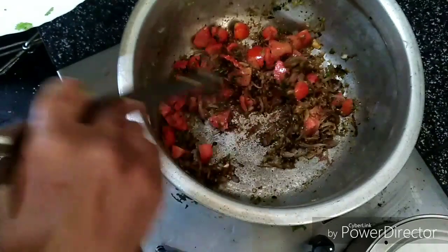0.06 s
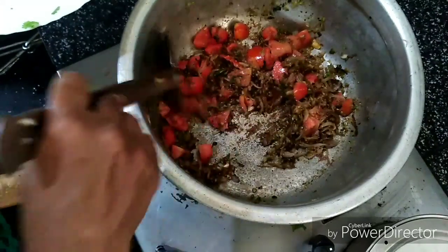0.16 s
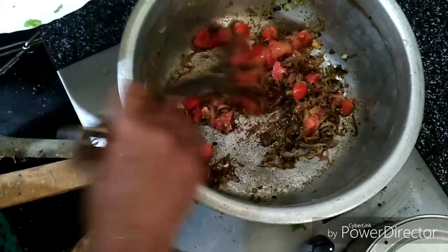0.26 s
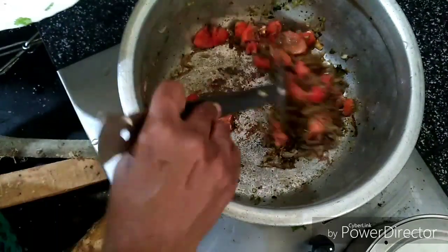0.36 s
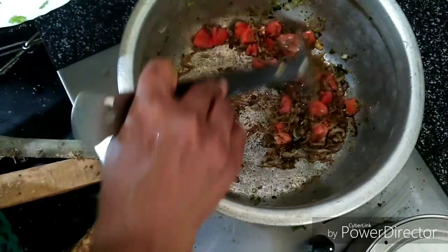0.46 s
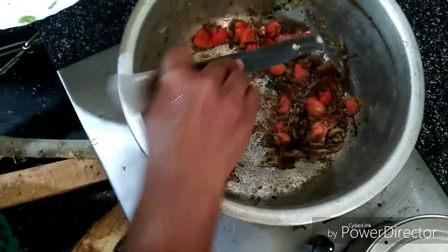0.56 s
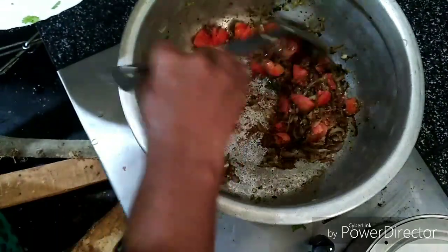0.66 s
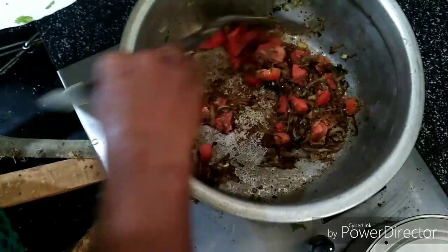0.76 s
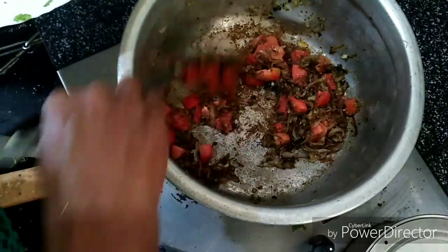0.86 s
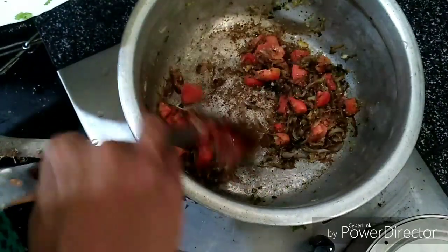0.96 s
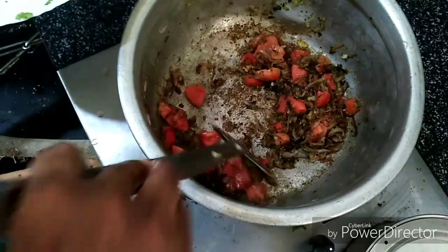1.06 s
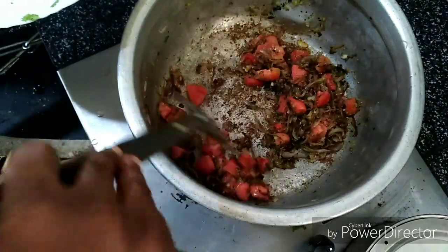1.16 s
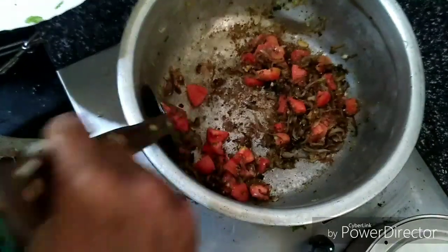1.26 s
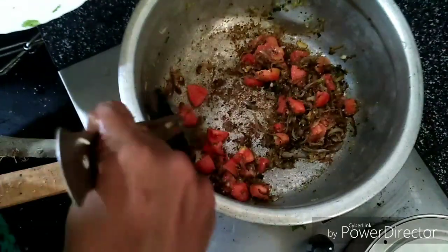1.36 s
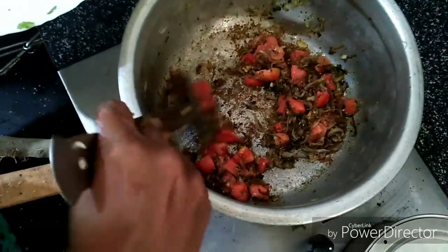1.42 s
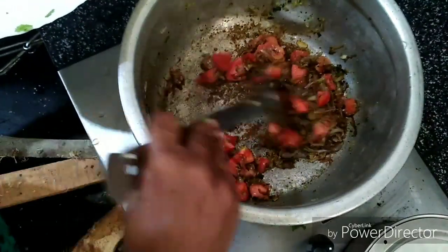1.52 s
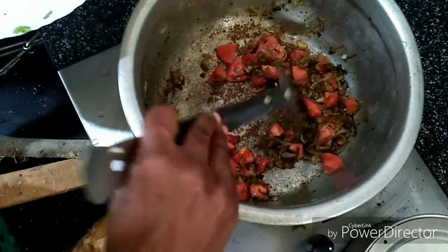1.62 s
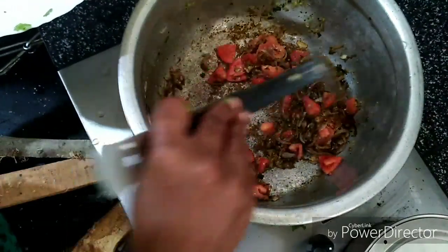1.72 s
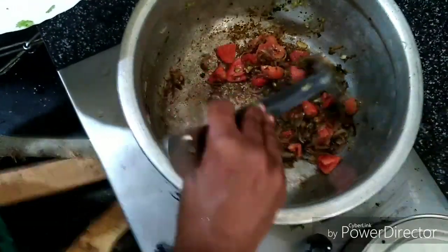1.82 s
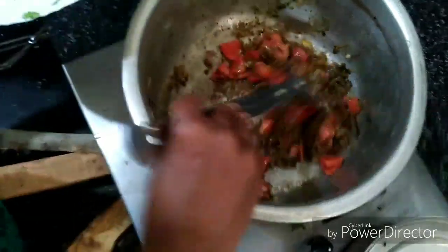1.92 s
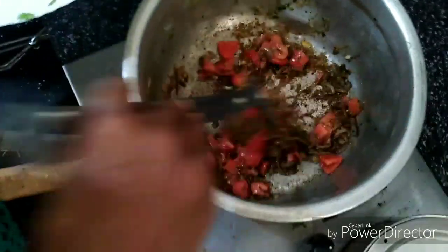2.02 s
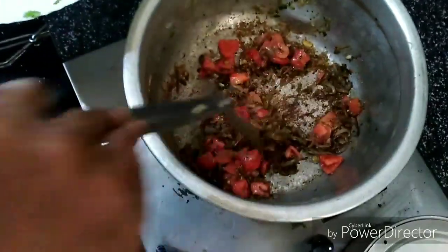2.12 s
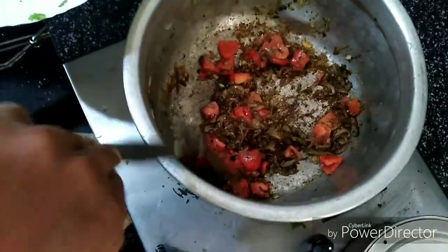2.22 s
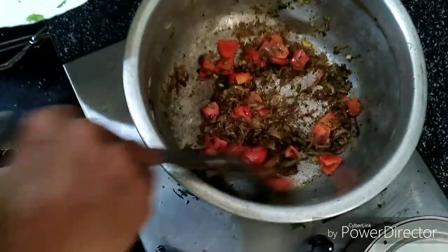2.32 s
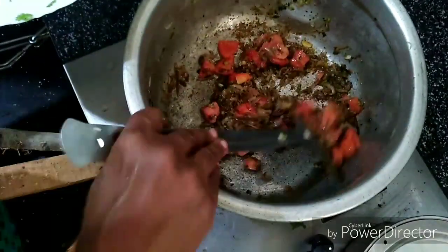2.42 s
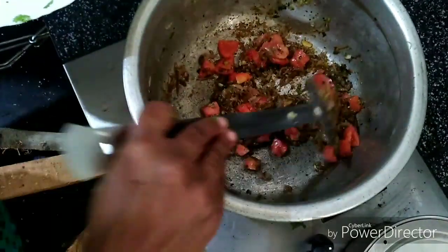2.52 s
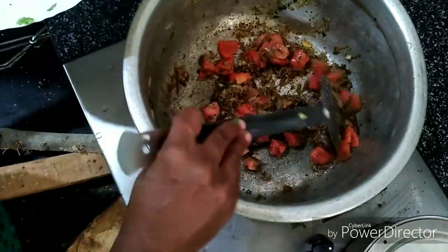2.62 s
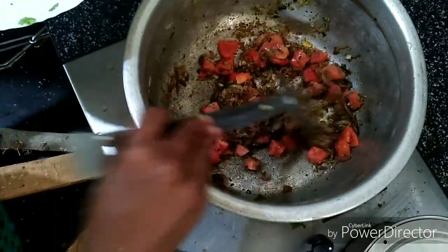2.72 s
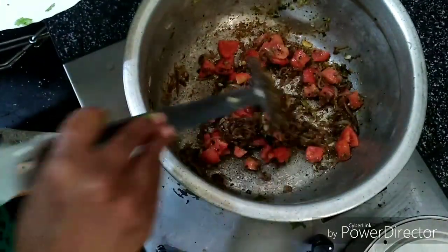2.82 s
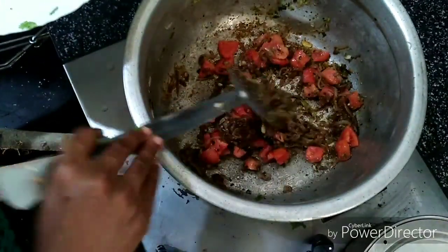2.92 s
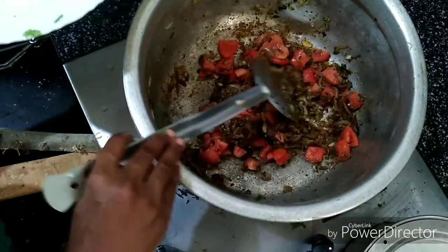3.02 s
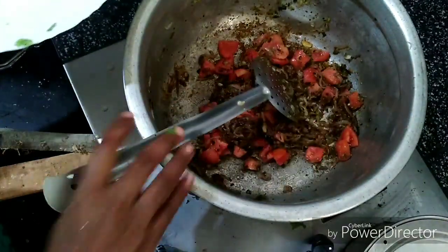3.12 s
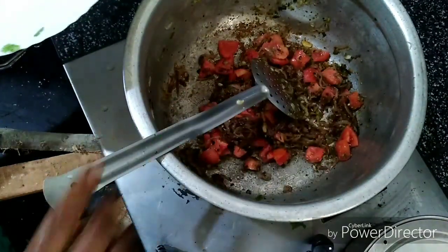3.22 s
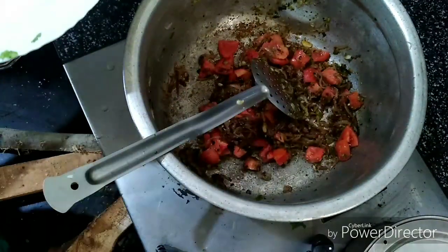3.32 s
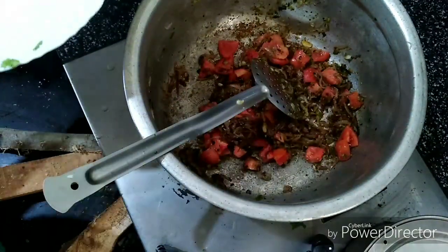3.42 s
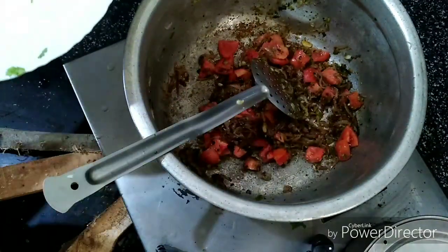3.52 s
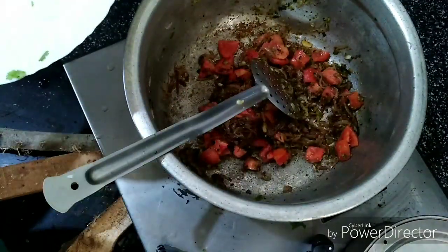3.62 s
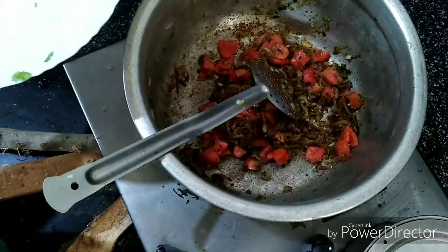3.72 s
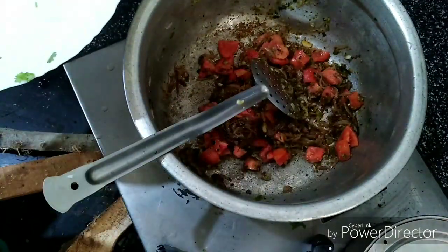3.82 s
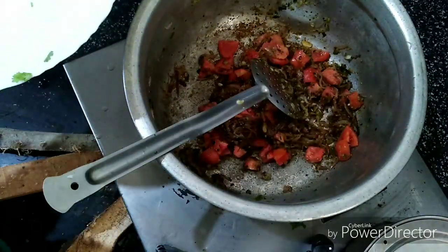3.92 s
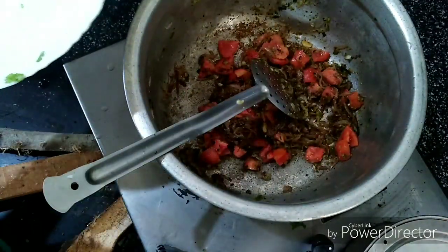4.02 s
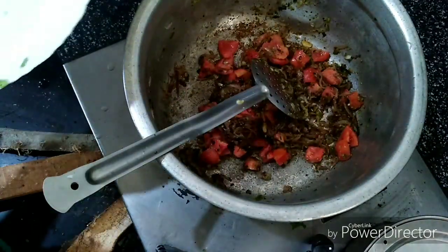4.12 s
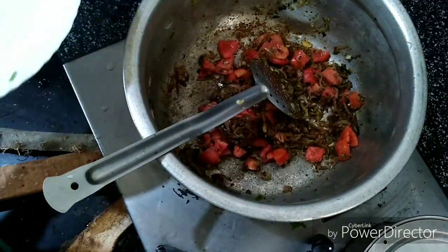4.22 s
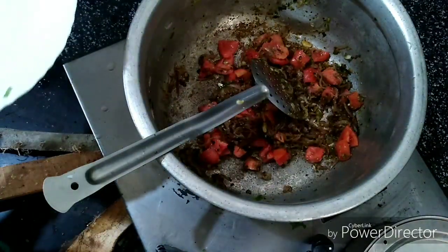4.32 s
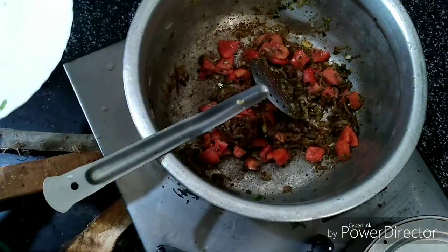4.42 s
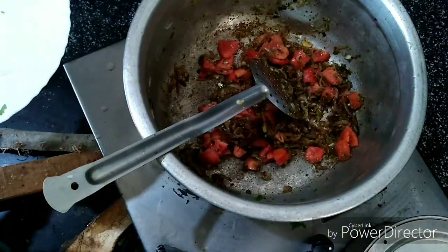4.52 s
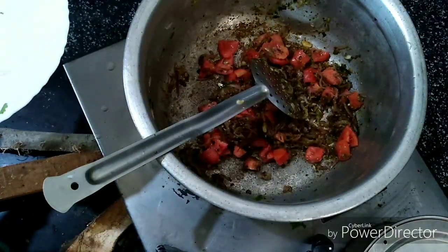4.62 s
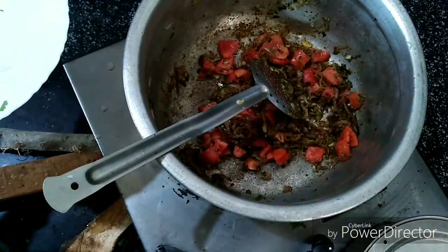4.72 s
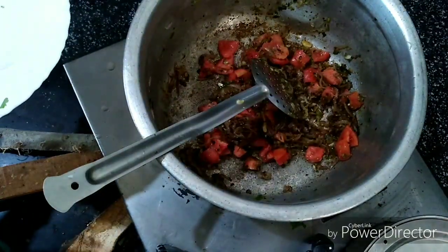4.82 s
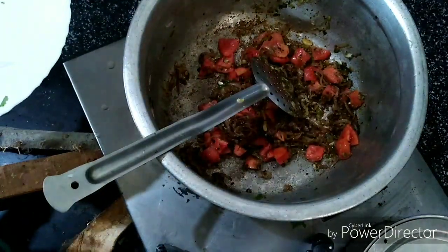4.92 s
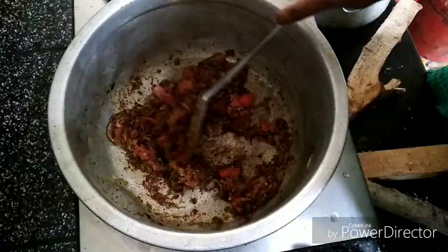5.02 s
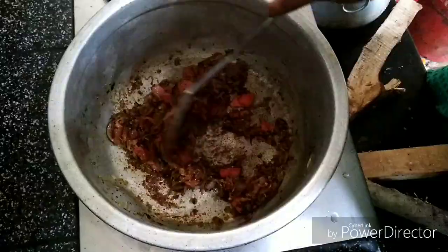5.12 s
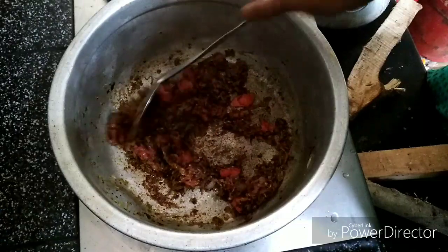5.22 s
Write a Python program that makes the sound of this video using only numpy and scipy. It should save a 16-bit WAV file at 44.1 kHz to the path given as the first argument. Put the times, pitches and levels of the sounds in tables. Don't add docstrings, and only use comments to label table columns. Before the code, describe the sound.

Irregular stirring in a steel pot: knocks and scrapes, hard clangs with short metallic ring, the loudest a double hit past two seconds. Fine crackling sizzle continues throughout, with small spits and steam puffs. After a last lighter clank at about three seconds only frying is left; it stops abruptly, and a weaker, duller sizzle rises at the end. Close microphone, slight room echo, strong peaks a little clipped.

```python
import sys
import numpy as np
from scipy import signal
from scipy.fft import rfft, irfft, next_fast_len
from scipy.io import wavfile
from scipy.ndimage import uniform_filter1d, map_coordinates

SR = 44100
rng = np.random.default_rng(int(sys.argv[2]) if len(sys.argv) > 2 else 0)


def invert_db(x):
    u = np.asarray(x, float) / 20
    return 10 ** u


def persist_wave(psi):
    counts = np.round(np.clip(psi, -1, 1) * 32767).astype(np.int16)
    wavfile.write(sys.argv[1], SR, np.atleast_2d(counts).T)


N = 231850

# (time [s], peak [dB], burst life [share], wall free for [s], 1250 Hz mode free for [s])
BLOWS = [
    (0.2057, -1, 0.24, 0.081, 0.38),
    (0.793, -8, 0.2, 0.0029, 0.0074),
    (1.313, -0.5, 0.29, 0.145, .115),
    (2.3264, 3, 0.41, 0.13, .3),
    (2.3438, -7, 0.87, 0.13, .28),
    (3.079, -3.5, 0.39, 0.023, 0.04),
    (3.1982, -8, 0.75, 0.11, 0.09),
]
# (frequency [Hz], width [Hz], level [dB])
BOTTOM_MODES = [(254, 79, -2.5), (285.5, 26, 1), (407.2, 35, 1.5), (520, 51, -1), (600, 59, -4.5),
                (871, 55, 0), (1174, 60, -5), (1840, 490, -15.5)]
# (frequency [Hz], density [dB per Hz])
RASP_COLOUR = [(590, -53.5), (1000, -8), (1230, -8), (1390, -10), (1930, 0.5), (8810, -8.5), (13700, -17),
               (14500, -35.5), (15000, -78.5)]
# (frequency [Hz], likeness [-1 to 1])
LIKENESS = [(60, 1), (130, 0.73), (290, 0.87), (640, 0.86), (1400, 0.18), (3080, 0.25), (6760, -0.078),
            (14800, 0.013)]


def unit(x):
    return x / np.sqrt(np.mean(x ** 2) + 1e-20)


def along(points, hz):
    f, v = np.transpose(points)
    return np.interp(np.log(hz + 1), np.log(f + 1), v)


def curves(rows):
    s, *columns = np.transpose(rows)
    t = np.arange(N) / SR
    return np.array([np.interp(t, s, column) for column in columns])


def wobble(rate):
    knots = rng.standard_normal(int(N * rate / SR) + 4)
    return map_coordinates(knots, [np.arange(N) * rate / SR])


def filtered(x, response):
    m = next_fast_len(N + SR // 2)
    return irfft(rfft(x, m) * response(np.fft.rfftfreq(m, 1 / SR)), m)[..., :N]


def resonances(modes):
    def response(f):
        total = 0
        for k, (centre, width, db) in enumerate(modes):
            damping = 1j * f * width
            total = total + (-1) ** k * invert_db(db) * damping / (centre * centre - f * f + damping)
        return total
    return response


def highpass(corner_hz):
    return lambda hz: 1 / (1 + (corner_hz / (hz + 1)) ** 4)


def grainy(spike_db, share):
    size = rng.exponential(size=(2, N)).clip(0, 2)
    spikes = (rng.random((2, N)) < share) * invert_db(spike_db * size)
    return rng.standard_normal((2, N)) * (1 + spikes)


def spread(pair, colour, alike):
    def mid_side(hz):
        turn = np.arccos(np.clip(along(alike, hz), -1, 1)) / 2
        return colour(hz) * [np.cos(turn), np.sin(turn)]
    mid, side = filtered(pair, mid_side)
    return unit(np.array([mid + side, mid - side]))


def patchy(x, patchy_db):
    z = signal.stft(x, nperseg=512)[2]
    field = uniform_filter1d(rng.standard_normal(z.shape[1:]), size=6, axis=0)
    field = uniform_filter1d(field, size=10, axis=1)
    return signal.istft(z * invert_db(patchy_db * unit(field)), nperseg=512)[1][:, :N]


def dying(t60s, length):
    hz, t, z = signal.stft(rng.standard_normal((2, length)), SR, nperseg=128)
    decay = invert_db(-60 * t / along(t60s, hz)[:, None])
    tail = signal.istft(z * decay, SR, nperseg=128)[1][:, :length]
    return tail / np.linalg.norm(tail[0])


def tone(hz, turn, t):
    return np.sin(2 * np.pi * hz * t + np.array([[turn], [-turn]]) / 2)


def ramp(start, rise_db, hold, fall_db):
    t = np.arange(N) / SR - start
    return np.minimum(rise_db * t, 0) - fall_db * np.maximum(t - hold, 0)


def shaking():
    # (frequency [Hz], density [dB per Hz])
    shaken_colour = [(40, -20), (90, 6), (200, -6), (330, -7), (600, -30)]
    level_db, let_go_s = -53, 3
    rumble = spread(rng.standard_normal((2, N)), lambda hz: invert_db(along(shaken_colour, hz)), LIKENESS)
    return invert_db(level_db + ramp(0, 0, let_go_s, 65) + 3.4 * wobble(6.1)) * rumble


def frying():
    # (time [s], vigour [dB], share of tiny bubbles [dB])
    vigour = [(0.0, -40, -7), (0.28, -42.5, -7), (0.39, -40, -5), (0.8, -38.5, -7.5), (0.94, -36, -6),
              (1.12, -39.5, -2), (1.33, -38.5, -6), (1.5, -39.5, -1), (1.73, -39, -4.5), (2.33, -39.5, -5),
              (2.86, -41.5, -2.5), (3.17, -36, -12), (3.39, -41.5, -3.5), (4.18, -42, -5),
              (4.78, -40.5, -7.5)]
    # (frequency [Hz], density [dB per Hz])
    sizzle_colour = [(530, -50.5), (900, -11.5), (1100, -18), (1170, -13), (1870, -8), (2480, -5.5),
                     (4410, -1.5), (4790, -1.5), (6820, 1), (10900, -4.5), (13500, -7.5), (14500, -18),
                     (15000, -54.5)]
    # (time [s], peak [dB])
    spits = [(0.5092, -55), (1.08, -20.5), (1.6676, -46), (1.708, -25), (1.953, -24.5), (2.178, -22.5),
             (2.443, -24), (2.623, -26.5), (2.7025, -25.5), (3.691, -32.5), (3.7394, -33), (3.8444, -27.5),
             (3.901, -36.5), (4.837, -31.5), (4.902, -31)]
    # (frequency [Hz], density [dB per Hz])
    hum_colour = [(15, -57.5), (25, -19), (90, 6.5), (220, -9.5), (422, -1), (605, -16), (838, -5),
                  (1060, -24.5), (1500, -16.5), (1950, -55), (3300, -120)]
    # (frequency [Hz], width [Hz], lift [dB])
    air_modes = [(91, 69, 2), (431, 49, 8.5), (844, 70, 15.5)]
    spit_t60_s = 0.01
    hum_db, hum_grows = -48.5, 0.41

    vigour_db, tiny_db = curves(vigour)
    colour = lambda hz: invert_db(along(sizzle_colour, hz))
    bubbles = spread(patchy(grainy(7, 0.0036), patchy_db=1.48), colour, LIKENESS)
    bubbles = bubbles * invert_db(0.55 * wobble(30))
    fizz = filtered(bubbles, highpass(7000))
    sizzle = invert_db(vigour_db + 7.5) * (bubbles - fizz + invert_db(tiny_db) * fizz)

    pops, t = np.zeros((2, N + 400)), np.arange(300) / SR
    for s, db in spits:
        pop = invert_db(db + 7.0 - 60 * t / spit_t60_s) * rng.standard_normal((2, 300))
        pops[:, round(s * SR):][:, :300] += pop
    pops = filtered(pops[:, :N], colour)

    air = resonances(air_modes)
    flame = patchy(rng.standard_normal((2, N)), patchy_db=2.26)
    hum = spread(flame, lambda hz: invert_db(along(hum_colour, hz)) * (1 + abs(air(hz))), LIKENESS)
    hum_gain = invert_db(hum_db + hum_grows * (vigour_db - vigour_db.mean()))
    return sizzle + pops + hum_gain * hum


def jets():
    # (start [s], length [s], frequency [Hz], width [Hz], level [dB])
    hisses = [(.1, .09, 787, 90.2, -44.5), (0.608, .1, 1667, 89.5, -52), (1.507, .07, 5500, 2490, -36),
              (1.547, .025, 3410, 696, -35), (1.598, .6, 1480, 80, -50.5), (2.44, .055, 6200, 2480, -24.5),
              (2.488, .03, 5240, 300, -30.5), (2.792, .12, 6000, 2500, -42), (2.707, 0.035, 2800, 1500, -41),
              (1.471, .015, 4900, 300, -38.5), (2.967, .04, 6000, 2490, -41.5), (4.455, .3, 4000, 700, -44),
              (4.647, .33, 4630, 900, -45)]
    out = np.zeros((2, N + SR))
    for s, length, hz, width, db in hisses:
        noise = rng.standard_normal((2, SR))[:, :round(length * SR)]
        band = signal.lfilter(*signal.iirpeak(hz, hz / width, SR), noise)
        samples = band.shape[1]
        out[:, round(s * SR):][:, :samples] += invert_db(db) * unit(band) * np.sqrt(np.hanning(samples))
    return out[:, :N]


def thuds():
    # (time [s], peak [dB], pitch [Hz], t60 [s], hardness [0-1])
    bottom_hits = [(0.2046, -5, 538, 0.049, 0.85), (0.2592, -1.5, 324, 0.015, 0.25),
                   (0.281, -11, 400, 0.027, .25), (0.322, -26, 450, .044, .4),
                   (.711, -16, 451, 0.0097, 0.8), (0.7933, -1.5, 510, 0.021, 0.78),
                   (0.8154, -3.5, 376, 0.021, .45), (.825, -25, 391, .027, .15),
                   (.864, -6, 600, 0.048, 0.6), (0.8834, -8, 424, 0.091, .15), (.925, -15, 300, 0.16, 0.2),
                   (0.944, -19, 295, .1, 0), (1.313, -18.5, 269.4, 0.26, 1),
                   (1.486, -14.5, 520, 0.037, 0.1), (1.509, -14.5, 520, 0.026, 0.3),
                   (2.327, -7, 844, 0.047, 0.68), (2.348, -34.5, 476, 0.073, 0.35),
                   (2.431, -11, 463, 0.083, 0.56), (2.452, -15.5, 424, 0.054, 0.83),
                   (3.081, -10.5, 520, 0.032, .95), (3.199, -16, 407, 0.015, 0.83),
                   (1.313, -20.5, 237.5, 0.25, 0.14), (2.461, -16.5, 240, 0.11, .1),
                   (3.083, -24.5, 107.2, 0.18, .02), (3.2, -29.5, 128.3, .13, 0),
                   (.283, -18.5, 476, 0.073, .1), (0.303, -15.5, 470, 0.14, .1),
                   (2.452, -21.5, 400, .08, 0), (.384, -28, 446, 0.034, .2), (.43, -29, 400, .03, .2),
                   (0.473, -24, 427, 0.038, .2), (.538, -32.5, 246, 0.033, .1), (.82, -25, 1137, .12, 0),
                   (0.867, -23.5, 1164, 0.086, 0), (.91, -20, 860, 0.042, .1),
                   (.968, -14.5, 860, 0.039, .1), (.996, -18.5, 850, 0.051, .1),
                   (1.525, -18.5, 1230, 0.063, 0), (1.555, -20.5, 555, .04, .3),
                   (2.39, -9.5, 431.3, 0.041, .2), (3.245, -23, 752, .1, 0)]
    swing, shake, t = np.zeros(N + SR), np.zeros(N), np.arange(SR // 3) / SR
    push = np.hanning(40)
    for s, db, hz, t60, hard in bottom_hits:
        at = round(s * SR)
        decay = invert_db(db - 4.0 - 60 * t / t60) * (1 - np.exp(-t * hz * 4))
        swing[at:][:len(t)] -= decay * np.sin(2 * np.pi * hz * t)
        shake[at:][:40] -= invert_db(db - 11 + 16.5 * hard) * push
        shake[at] -= invert_db(db - 3 + 44 * hard)
    knock = swing[:N] + filtered(shake, resonances(BOTTOM_MODES))
    later_port = filtered(knock, lambda hz: 1.05 * np.exp(-1j * hz / 1600))
    return np.array([knock, later_port])


def wall():
    wall_hz = [476, 520, 1135, 1162, 1250, 1565, 1956, 1979, 2025, 2632, 2648]
    # (level [dB], t60 [s], left-right phase [rad])
    wall_modes = [(0, 0.35, 0.64), (-28.5, 0.26, 0.59), (-7, 0.17, 1.1), (-16.5, .25, 2.2), (5, 0.7, 2.44),
                  (2.5, 0.28, 0.46), (-5.5, 0.39, 2), (-4, 0.33, 1.5), (-5.5, .18, 1.2), (0, 0.31, 0.72),
                  (0.5, 0.18, 1.2)]
    ring_hz = [476, 1130, 1250, 1565, 1960, 2640]
    shares_db = [(-18.5, -33.5, -25, -22, -18), (-20, -6.5, -10.5, -22, -9), (-24.5, -30, -17, -21.5, -9.5),
                 (-23.5, -19, -22.5, -23, -23), (-11.5, -27.5, -27, -30.5, -20.5),
                 (-51.5, -31.5, -31.5, -24.5, -10), (-40.5, -23, -27.5, -32, -12)]
    rims_db = [-35.5, -39, -24, -24.5, -28.5, -38, -22.5]
    twin_hz = [1979, 2025, 2648]
    # (1979 Hz [dB], 2025 Hz [dB], 2648 Hz [dB])
    twins_db = [(-7, -13, 1), (1.5, -5.5, -1), (0, -15, -4), (5.5, -9.5, 0.5), (2, -8.5, -1),
                (-2.5, 2, -4.5), (-4, 1.5, -5)]
    touches_db = [27, 36, 14, 20, 20, 7.2, 8.2]

    ring, t = np.zeros((2, N + SR)), np.arange(SR // 2) / SR
    unrest_db = [1.5 * wobble(45) for hz in wall_hz]
    for blow, share_db, rim_db, twin_db, touch_db in zip(BLOWS, shares_db, rims_db, twins_db, touches_db):
        s, _, _, wall_free, long_free = blow
        at = round(s * SR)
        strike = list(zip(ring_hz, [*share_db, rim_db]))
        twins = dict(zip(twin_hz, twin_db))
        for hz, (level, t60, turn), rough_db in zip(wall_hz, wall_modes, unrest_db):
            slow = hz == 1250
            touched = np.maximum(t - (long_free if slow else wall_free), 0)
            lost_db = np.minimum(60 * touched / 0.067, touch_db)
            size = invert_db(along(strike, hz) + twins.get(hz, 0) + level - 60 * t / t60 - lost_db)
            size = size * (1 - np.exp(-t / (0.02 if slow else 0.003)))
            size = size * invert_db(rough_db[at:][:len(t)])
            ring[:, at:][:, :len(t)] += size * tone(hz, turn, t)
    return ring[:, :N]


def clanks():
    # (frequency [Hz], level [dB], t60 [s])
    spoon_modes = [
        [(3058, -10, 0.11), (3290, 0.5, 0.081), (3780, -4.5, .06), (4100, -9, .07), (4590, -2.5, .04),
         (5290, -12.5, 0.031), (6750, -14, .04)],
        [(4802, -5, 0.032), (5130, -12, 0.18), (5453, 0, 0.023), (6546, -22, 0.17), (6740, -16.5, 0.65),
         (7100, -12, 0.11)],
        [(3100, -2, 0.089), (3332, -26, 5.0), (4172, -10, 0.36), (5276, -13, 0.2), (6400, -21, 0.22),
         (6864, -16, 0.12), (7700, -34, 0.64), (7973, -23, 0.4)],
        [(3250, -1, .07), (3490, -3, .07), (4140, -2, 0.099), (4850, -1.5, .08), (5250, -2, 0.059),
         (5850, 0.5, .06), (7000, -8.5, .07), (7560, -9.5, 0.058)],
        [(3000, 3.5, 0.18), (3402, -9, 5.0), (4468, -3.5, 0.14), (4630, -12.5, 0.16), (4870, -7, 0.36),
         (5800, -5, 0.46), (6880, -17, 0.24), (8032, -14, 0.086)],
        [(2891, 2, 0.11), (3397, -1.5, 0.097), (3472, -9, 0.17), (4270, -4, 0.15), (4950, -5.5, 0.14),
         (5670, -23.5, 0.19), (6406, -12.5, 0.28), (6988, -37, 5.0), (7350, -18.5, 0.07)],
        [(3120, -0.5, 0.15), (3530, -1, 0.12), (4050, -9, 0.27), (4880, 1, 0.19), (5400, -12, 0.43),
         (6347, -11.5, 0.21), (6330, -7, 0.21), (6955, -15, 0.17), (8856, -21, 0.46)],
    ]
    spoon_levels = [-11, -28, -14, -12, -18, -16, -19]
    # (frequency [Hz], t60 [s])
    fades = [(1000, 0.068), (3000, 0.18), (6000, 0.19), (14000, 0.072)]
    # (frequency [Hz], density [dB per Hz])
    crack_colour = [(410, -27), (700, -7), (1990, -4), (2290, -21), (2790, -3), (4210, 1), (10800, -9.5),
                    (13600, -24.5), (15300, -52)]
    longest_s = 0.45

    ring, burst, t = np.zeros((2, N + SR)), np.zeros((2, N + SR)), np.arange(SR // 6) / SR
    rise = 1 - np.exp(-t / 0.0015)
    for (s, db, life, *_), spoon_db, modes in zip(BLOWS, spoon_levels, spoon_modes):
        at = round(s * SR)
        spoon = 0
        for hz, level, t60 in modes:
            decay = invert_db(level - 60 * t / min(t60, longest_s * life))
            spoon = spoon + decay * tone(hz, rng.uniform(-2, 2), t + rng.random())
        ring[:, at:][:, :len(t)] += invert_db(spoon_db) * rise * spoon

        dense_hz = 1800 * (15000 / 1800) ** ((np.arange(64) + rng.random(64)) / 64)
        decay_rate = np.log(1000) / (along(fades, dense_hz) * life)
        waves = np.exp(t[:, None] * (2j * np.pi * dense_hz - decay_rate))
        heard = np.exp(2j * np.pi * rng.random((64, 2))) * invert_db(3 * rng.standard_normal((64, 2)))
        hiss = invert_db(-60 * t / (0.31 * life)) * rng.standard_normal((2, len(t)))
        crack = (waves @ heard).real.T + 4.94 * hiss
        burst[:, at:][:, :len(t)] += invert_db(db - 18.5) * rise * crack
    return ring[:, :N] + filtered(burst[:, :N], lambda hz: invert_db(along(crack_colour, hz)))


def bell():
    # (start [s], swell [s], peak [dB], fading [dB per s], touched at [s])
    pushes = [
        (0.206, 0.084, -25.5, 46.5, 0.8),
        (.9, .03, -49, 13, 1.25),
        (1.315, .07, -37.5, 14, 1.79),
        (1.9, 0.018, -47.5, 30, 1.98),
        (2.33, .07, -25, 63, 2.55),
        (2.6, .02, -44.5, 23.5, 4.2),
        (3.199, .045, 1.5, 60, 3.106),
    ]
    bell_hz, start_db, touch_db_per_s = 742, -4.5, 297
    t = np.arange(N) / SR
    level = 0
    for s, swell, db, fade_db, touch in pushes:
        shape_db = ramp(s + swell, -start_db / swell, 0, fade_db)
        lost_db = touch_db_per_s * np.maximum(t - touch, 0)
        level = level + (t > s) * invert_db(db + shape_db - lost_db)
    phase = 2 * np.pi * bell_hz * t + 0.23 * wobble(8.0)
    level = np.sqrt(2) * invert_db(-0.5) * uniform_filter1d(level, size=130)
    return level * np.sin(phase + np.array([[0.4], [-0.4]]))


def pressure():
    # (start [s], length [s], rumble [dB], rasp at the end [dB], chatter pitch [Hz])
    drags = [(0.215, 0.014, -19, -30, 452.8), (0.253, 0.028, -28, -33.5, 445),
             (0.286, 0.071, -23.5, -26, 478), (0.354, 0.13, -35, -55, 474), (0.496, 0.2, -43.5, -42, 400),
             (0.709, 0.011, -25.5, -55, 378), (0.745, 0.026, -47, -40, 372.2),
             (0.799, 0.031, -19.5, -31.5, 386.3), (0.865, .038, -23.5, -28, 452.8),
             (.915, 0.053, -24, -24, 310.5), (1.029, 0.084, -41.5, -56.5, 395),
             (1.131, 0.16, -72, -50, 400), (1.317, 0.036, -28, -30.5, 371),
             (1.392, 0.046, -36.5, -47, 463.5), (1.454, 0.043, -32, -33, 540),
             (1.501, 0.018, -29.5, -30.5, 500), (1.53, 0.033, -27, -25, 446),
             (1.631, 0.68, -48.5, -57, 420), (2.34, 0.052, -22, -29.5, 471), (2.413, 0.059, -26, -27, 440),
             (2.508, 0.073, -36, -66.5, 449), (2.61, 0.16, -47, -53, 440), (2.77, 0.11, -44.5, -38.5, 405),
             (2.977, 0.032, -46.5, -39, 400), (3.098, 0.042, -30, -38.5, 363),
             (3.205, 0.029, -23.5, -44, 316.6), (3.287, 0.088, -42, -40, 410)]
    dig_db_per_s, lift_db_per_s = 1800, 366.5
    speed_up_db_per_s, brighten_db_per_s = 58, 87
    chatter_sag_hz = 30

    gains, t, glide = np.zeros((3, N)), np.arange(N) / SR, []
    for s, length, rumble_db, rasp_db, hz in drags:
        early = np.clip(t - s - length, -length, 0)
        dull_db = rasp_db + speed_up_db_per_s * early
        bright_db = dull_db + brighten_db_per_s * early
        shape_db = ramp(s, dig_db_per_s, length, lift_db_per_s)
        near = slice(round((s - 0.05) * SR), round((s + length + 0.2) * SR))
        gains[:, near] += invert_db((shape_db + [rumble_db + 0 * t, dull_db, bright_db])[:, near])
        glide += [(s, hz + chatter_sag_hz / 2), (s + length, hz - chatter_sag_hz / 2)]
    return *gains, curves(sorted(glide))[0]


def strokes():
    rumble_gain, dull_gain, bright_gain, chatter_hz = pressure()
    slips = (rng.random(N) < 110 / SR) * rng.exponential(size=N).clip(0, 1.5)
    jerks = 0.72 + signal.lfilter([1], [1, -np.exp(-1 / (0.0018 * SR))], slips)

    body = resonances(BOTTOM_MODES + [(476, 3.3, -26.0), (1150, 12, -25.5), (116.0, 78, -14)])
    push = spread(grainy(2.9, 0.012), np.ones_like, [(200, 0.93), (700, 0.8), (1300, 0.17)])
    rumble = filtered(jerks * push, body)

    chatter_phase = 2 * np.pi * np.cumsum(chatter_hz * (1 + 0.019 * wobble(50))) / SR
    chatter = unit(invert_db(3.5 * wobble(30)) * np.sin(chatter_phase))

    steel_hz = np.geomspace(1300, 9000, 26) * rng.uniform(0.97, 1.03, size=26)
    steel = resonances([(hz, hz / 90, 1.5 * rng.normal() - 3) for hz in steel_hz])
    colour = lambda hz: invert_db(along(RASP_COLOUR, hz)) * (0.32 + steel(hz))
    rough = spread((0.33 + jerks) * grainy(5, 0.0044), colour, [(1000, 0.095), (5000, 0.038)])
    bright = filtered(rough, highpass(4500))
    rasp = dull_gain * (rough - bright) + invert_db(3.5) * bright_gain * bright

    low = rumble_gain * invert_db(-6.0) * (unit(rumble) + invert_db(-6.5) * chatter)
    return low + invert_db(1.6 * wobble(90)) * rasp


def ticks():
    # (time [s], peak [dB])
    catches = [(.2235, -13), (.3226, -9), (.366, -19), (.95, -22.5), (1.512, -18), (1.522, -9),
               (1.557, -17.5), (2.339, -8), (2.358, -17.5), (2.37, -16.5), (2.447, -23), (2.476, -22),
               (3.213, -30), (3.221, -7)]
    t60_s = 0.02
    out, t = np.zeros((2, N + SR)), np.arange(1200) / SR
    for s, db in catches:
        catch = invert_db(db - 60 * t / t60_s) * rng.standard_normal((2, len(t)))
        out[:, round(s * SR):][:, :len(t)] += catch
    return filtered(out[:, :N], lambda hz: invert_db(along(RASP_COLOUR, hz)))


def kitchen(x):
    # (frequency [Hz], t60 [s])
    room_decay = [(200, 0.24), (2000, 0.66), (10000, 0.25)]
    source = np.pad(x.mean(axis=0) + x[0], (300, 0))[None]
    return signal.fftconvolve(source, dying(room_decay, SR // 2), axes=1)[:, :N]


def later():
    # (frequency [Hz], density [dB per Hz])
    later_colour = [(180, -23), (300, -7), (480, -13), (613, -34), (807, -13), (1620, -18), (2000, -18.5),
                    (7950, -13.5), (14500, -45.5)]
    # (frequency [Hz], width [Hz], depth re full cancel [dB])
    dips = [(1740, 430, -4.5), (4000, 470, -12)]
    start_s, rise_s, level_db, floor = 5.087, 0.18, -51.5, 0.29
    bump_s, bump_width_s, bump_peak_db = 5.228, 0.0124, 7.5
    swing_hz, swing_db, swing_t60_s = 85, 10, 0.12

    t = np.arange(N) / SR
    fader = invert_db(level_db) * (t > start_s) * (floor + (1 - floor) * (t - start_s) / rise_s)
    bump_db = bump_peak_db * np.exp(-((t - bump_s) / bump_width_s) ** 2)
    colour = lambda hz: invert_db(along(later_colour, hz)) * (1 - abs(resonances(dips)(hz)))
    sizzle = spread(grainy(2.9, 0.005), colour, LIKENESS)
    since = np.maximum(t - bump_s, 0)
    swing = invert_db(swing_db - 60 * since / swing_t60_s) * np.sin(2 * np.pi * swing_hz * since)
    rumble = spread(grainy(0, 0.00097), resonances([(91.8, 98, 0)]), LIKENESS)
    return fader * (invert_db(0.397 * bump_db) * sizzle + invert_db(-11.5 + bump_db) * rumble + swing)


def scene():
    # (time [s], level [dB])
    first_fader = [(0, 0), (4.981, 0), (4.984, -18), (4.99, -42), (5.0, -70), (5.01, -110)]
    rings, knocks = wall(), clanks() + thuds() + strokes() + ticks()
    mouth_hz, mouth_width_hz, mouth_depth = 2310, 350, 0.59
    knocks = knocks - mouth_depth * filtered(knocks, resonances([(mouth_hz, mouth_width_hz, 0)]))
    room = invert_db(-17.0) * kitchen(knocks + invert_db(-8) * rings)
    first = rings + knocks + bell() + room + frying() + jets() + shaking()
    return first * invert_db(curves(first_fader)) + later()


def roll_off(x):
    return signal.sosfilt(signal.butter(12, 15450, fs=SR, output="sos"), x)


def record(dry):
    # (frequency [Hz], left-right level [dB])
    port_lean = [(60, 0.5), (110, 2.5), (200, 2), (380, -0.5), (690, 0.5), (1280, 4.5), (2370, -1),
                 (4360, -0.5), (8050, -4.5), (14800, 0)]
    bass_cut = lambda hz: (1j * hz / (50 + 1j * hz)) ** 2
    balance = lambda hz: invert_db(np.outer([0.5, -0.5], along(port_lean, hz)))
    ports = filtered(dry, lambda hz: bass_cut(hz) * balance(hz))
    mix = filtered(np.clip(ports, -1, 1), lambda hz: hz < 15400)
    return roll_off(mix)


dry = scene()
out = record(dry)
persist_wave(out)
```